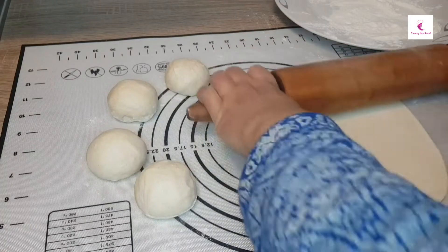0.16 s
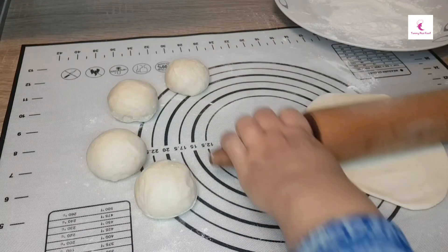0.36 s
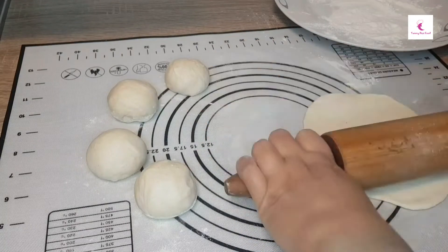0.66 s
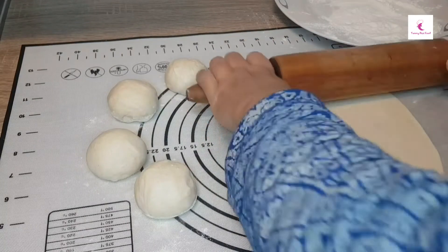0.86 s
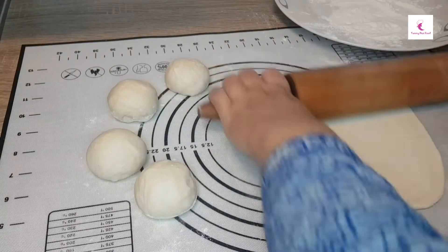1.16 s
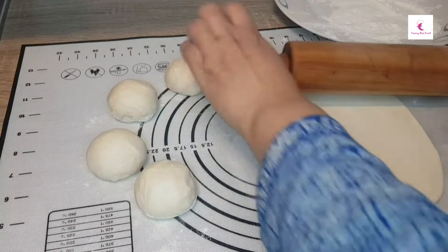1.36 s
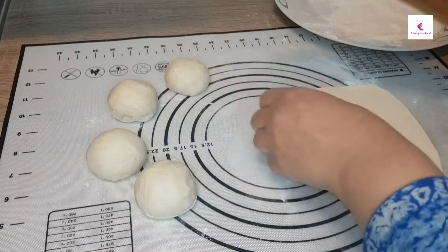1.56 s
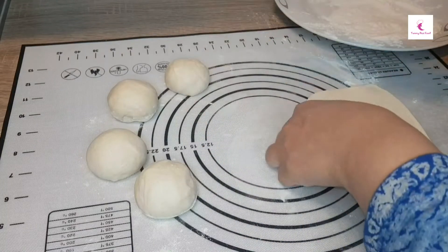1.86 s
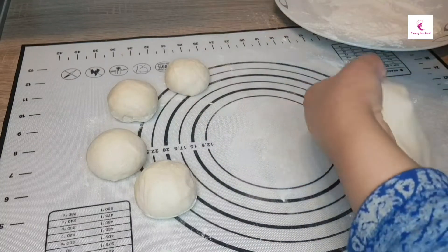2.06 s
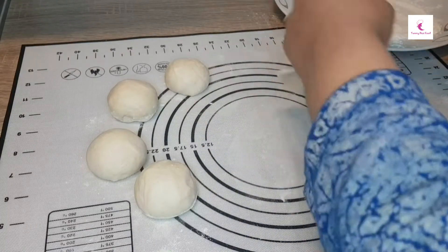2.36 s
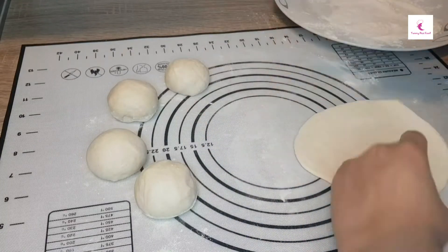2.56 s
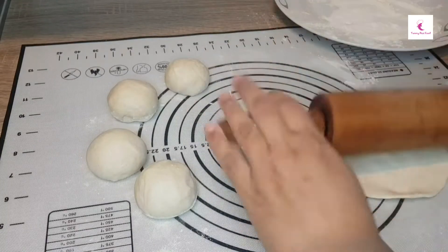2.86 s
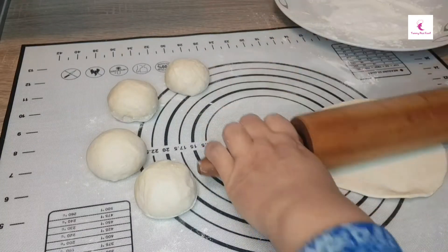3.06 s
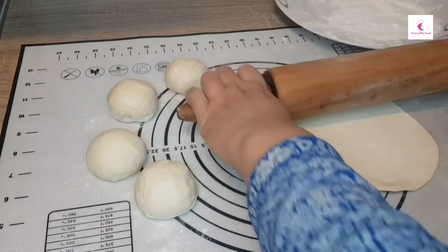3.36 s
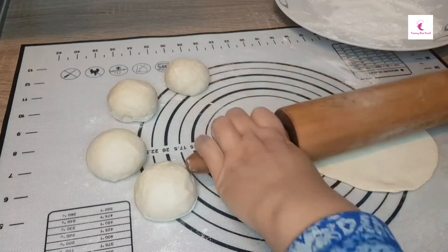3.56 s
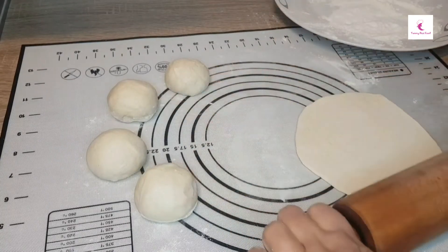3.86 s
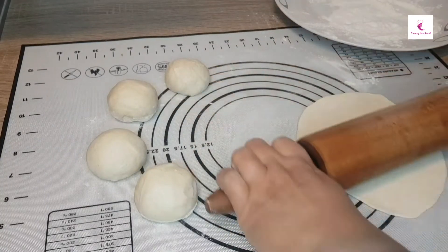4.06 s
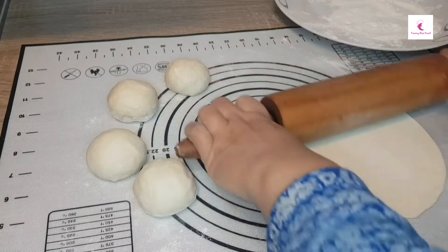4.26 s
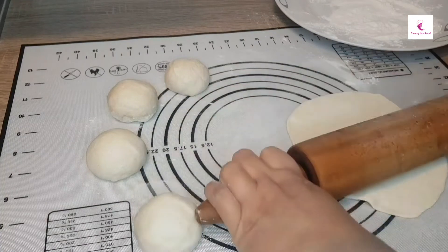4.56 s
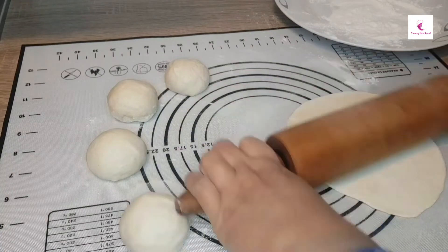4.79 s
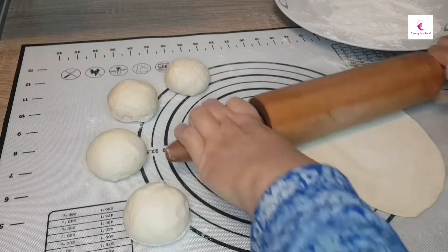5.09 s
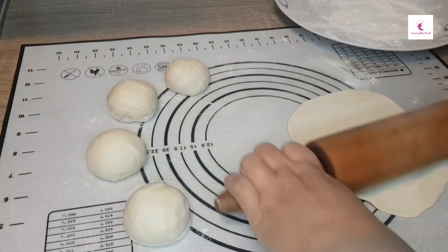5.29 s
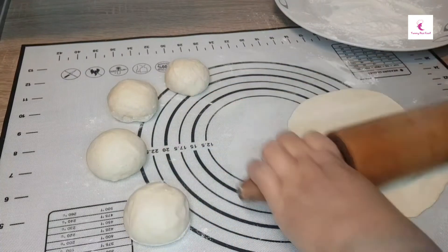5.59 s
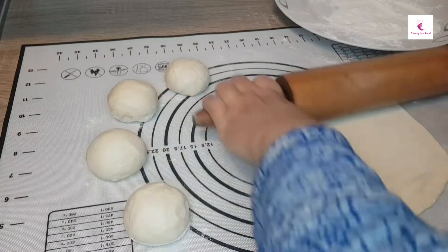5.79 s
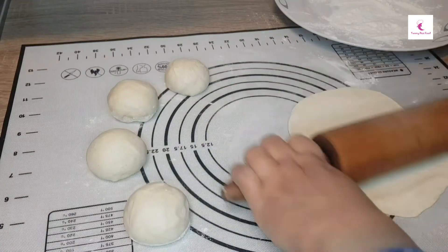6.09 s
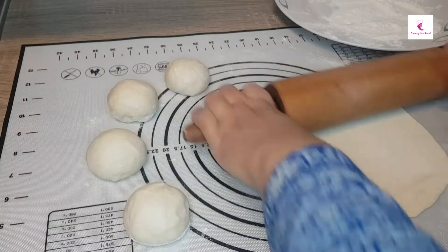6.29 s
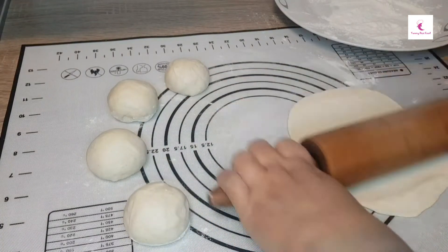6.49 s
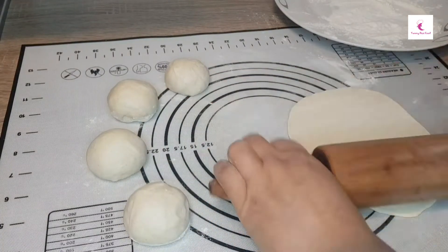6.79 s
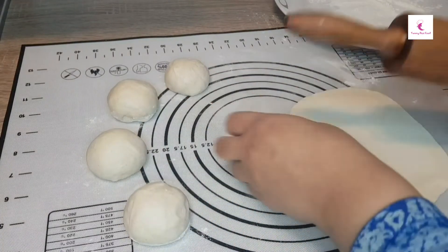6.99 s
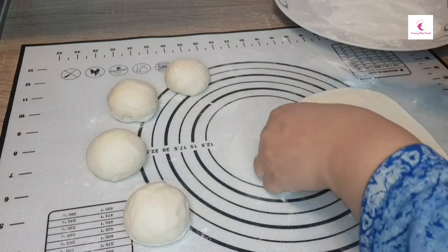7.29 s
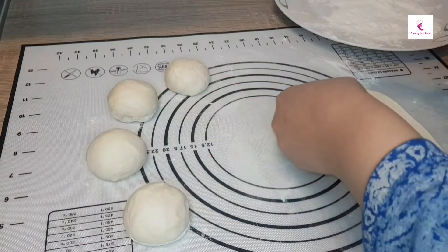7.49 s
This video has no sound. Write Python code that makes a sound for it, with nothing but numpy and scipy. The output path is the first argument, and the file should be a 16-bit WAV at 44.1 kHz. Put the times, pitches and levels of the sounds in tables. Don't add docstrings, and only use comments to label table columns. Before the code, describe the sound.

Wooden rolling pin swishes and rumbles over floured dough on a mat, pauses for sharp wooden cracks and sticky snaps, then rolls again.

```python
import sys
import numpy as np
from scipy import signal
from scipy.fft import rfft, irfft, next_fast_len
from scipy.io import wavfile

SR = 44100
rng = np.random.default_rng(int(sys.argv[2]) if len(sys.argv) > 2 else 0)


def gain_from_db(level_db):
    decades = np.asarray(level_db, float) / 20
    return 10 ** decades


def unload_wav(signal):
    wavfile.write(
        sys.argv[1],
        SR,
        np.round(np.clip(np.atleast_2d(signal).T, -1, 1) * 32767).astype(np.int16),
    )


N = 336914

# hz, level_db (per Hz)
HISS_COLOUR = [(3600, -41), (4700, -3.5), (6500, -2), (8500, -5.5), (10500, -6.5), (13000, -2),
               (15950, -9.5), (16200, -51.5)]
# hz, level_db (per Hz)
RUB_LOW_COLOUR = [(650, -23), (950, -10.5), (1250, -3.5), (1720, 4.5), (2150, -4), (2600, -27.5)]
# hz, level_db (per Hz)
RUB_HIGH_COLOUR = [(1900, -21.5), (2500, -4.5), (3100, -1), (3700, -4.5), (4500, -5.5), (5500, -33)]
# hz, level_db (per Hz)
SQUEEZE_COLOUR = [(140, -33), (230, -6.5), (317, -1), (351, -10), (604, -8), (833, -15), (1500, -18),
                  (1950, -47.5), (3300, -120)]
# hz, level_db (per Hz)
RUMBLE_COLOUR = [(12, -41), (20, 3.5), (43, 1.5), (102, 1), (160, -7), (199, -1.5), (260, -11), (340, -38),
                 (570, -120)]
# hz, likeness (0-1)
MAT_LIKENESS = [(60, 0.93), (180, 0.78), (550, 0.97), (1650, 0.13), (5000, 0.044), (15000, 0.048)]
# low_rub_db, high_rub_db
PASS_GRIP = [(0, 2), (-5.5, 0.5), (2.5, 0.5), (-1, 1), (2, 3), (-1, 1.5), (4, -0.5), (1, -2), (1, -0.5),
             (-1, -2.5), (3, -4), (3, -3), (-1, -1), (4, 0), (-2, -3.5), (1.5, 0), (6.5, 0), (4.5, -0.5),
             (5, 4), (-2, 2.5), (-8, -2.5), (-1.5, 7), (-6, 1)]
PIN_LANDINGS = [
    0.163,
    0.528,
    0.897,
    1.138,
]


def strokes():
    s, half_s, speed_db, bright_db, rub_db, squeeze_db, weight_db = moves()
    flour = gritty(3500, 2.1, 0.8)

    hiss = two_ports(flour, HISS_COLOUR, MAT_LIKENESS, pan_db=-1.5, lag_ms=0.19)
    hiss_sink_db = (9, 15)
    bright = signal.sosfilt(signal.butter(1, 9900, "high", fs=SR, output="sos"), hiss)
    dark = (hiss - bright) * swells(s, half_s, speed_db, hiss_sink_db)
    bright = bright * swells(s, half_s, speed_db + bright_db, hiss_sink_db)
    hiss = (dark + bright) * gain_from_db(1.0 * drift(30))

    rub_low = two_ports(flour, RUB_LOW_COLOUR, MAT_LIKENESS, pan_db=-3.0, lag_ms=0.082)
    rub_high = two_ports(flour, RUB_HIGH_COLOUR, MAT_LIKENESS, pan_db=-2.0, lag_ms=0.12)
    rub_sink_db, rub_high_db = (15, 12), 1.5
    hand_moves = len(s) - len(PASS_GRIP)
    low_db, high_db = np.pad(np.transpose(PASS_GRIP), [(0, 0), (0, hand_moves)])
    rub = rub_low * swells(s, half_s, rub_db + low_db, rub_sink_db)
    rub = rub + rub_high * swells(s, half_s, rub_db + high_db + rub_high_db, rub_sink_db)
    friction = hiss + rub * gain_from_db(2.0 * drift(30))

    pressed_s = s + .005
    squeeze = two_ports(gritty(900, 1.3, .9), SQUEEZE_COLOUR, MAT_LIKENESS, pan_db=-2.5, lag_ms=0.23)
    squeeze = squeeze * swells(pressed_s, half_s, squeeze_db, (10.5, 7)) * gain_from_db(3.2 * drift(28))
    rumble = two_ports(gritty(150, 2.1, 0.49), RUMBLE_COLOUR, MAT_LIKENESS, pan_db=-1.4, lag_ms=.1)
    rumble = rumble * swells(pressed_s, half_s, weight_db, (11, 10)) * gain_from_db(0.99 * drift(22))

    lift_s, lift_db = .035, -7
    before_s = np.array(PIN_LANDINGS)[:, None] - np.arange(N) / SR
    lift = np.sum(np.clip(2 - before_s / lift_s, 0, 1) * (before_s > 0), axis=0)
    pressure = (squeeze + rumble) * gain_from_db(lift_db * lift)
    return friction + 0.59 * pressure + gain_from_db(-50.0) * counter(pressure, damping=0.5)


# start_s (at full speed), flour_hiss_db, squeeze_db, weight_db
PIN_PASSES = [(0.065, -64, -56, -46.5), (0.238, -67, -58, -47.5), (0.41, -62.5, -59, -47.5),
              (0.586, -64, -56.5, -46), (0.789, -59.5, -56, -52), (.96, -63.5, -60.5, -46.5),
              (1.156, -61.5, -55.5, -46), (1.276, -67.5, -62, -61), (4.495, -67.5, -68, -64.5),
              (4.642, -66, -64.5, -57), (4.808, -65, -59, -62), (5.001, -63, -59, -55),
              (5.194, -63, -61, -56.5), (5.388, -63, -57, -55), (5.577, -61.5, -54.5, -49.5),
              (5.784, -61.5, -55.5, -52), (5.96, -61.5, -54, -46.5), (6.131, -63, -56.5, -54.5),
              (6.226, -63, -66, -55), (6.382, -61.5, -54, -45.5), (6.558, -59.5, -54, -52),
              (6.68, -68, -74, -61), (6.774, -57.5, -55.5, -52.5)]
# half_length_s, extra_brightness_db
PASS_PACE = [(0.084, 4), (0.078, 1), (0.069, 0.1), (0.079, -1.5), (0.074, -3.5), (0.075, -1.5), (0.077, -1),
             (0.063, 4.5), (0.076, 10.5), (0.097, 0.1), (0.11, -3.5), (0.086, -7.5), (0.083, -1),
             (0.09, -11), (0.081, 1.3), (0.078, -12), (0.067, -5), (0.08, -9), (0.066, -1), (0.087, 0.5),
             (0.074, -5), (.08, -3), (0.076, 1.5)]
# start_s, half_length_s,
# flour_hiss_db, squeeze_db, weight_db
HAND_MOVES = [(1.46, 0.076, -67.5, -69.5, -70), (1.56, 0.065, -103, -65, -87),
              (1.71, 0.069, -100, -71.5, -51), (1.8, .04, -70.5, -97, -64), (2.005, 0.04, -65.5, -102, -90),
              (2.08, 0.06, -70, -79, -88), (2.36, 0.2, -78, -76.5, -88), (2.55, 0.092, -65.5, -61, -70),
              (3.05, 0.17, -67.5, -58.5, -56.5), (2.89, 0.05, -81.5, -94, -79.5),
              (3.192, 0.022, -57.5, -52.5, -43.5), (3.23, 0.033, -64.5, -50.5, -53),
              (3.285, 0.041, -63, -55.5, -53), (3.37, 0.092, -72, -75, -77.5),
              (3.77, 0.15, -66, -68.5, -64), (3.98, 0.05, -94, -78, -54), (4.26, .1, -70.5, -72, -71),
              (4.36, 0.079, -91.5, -78, -67), (6.86, 0.071, -59, -72, -81),
              (7.03, 0.069, -71.5, -89.5, -89), (7.28, 0.1, -68, -94, -68.5),
              (7.46, 0.11, -67.5, -74.5, -85.5), (7.595, .02, -71, -73, -60)]


def moves():
    s, speed_db, squeeze_db, weight_db = np.transpose(PIN_PASSES)
    half_s, bright_db = np.transpose(PASS_PACE)
    pin = [s, half_s, speed_db, squeeze_db, weight_db, np.full(len(s), -6)]
    hand = [*np.transpose(HAND_MOVES), np.full(len(HAND_MOVES), -9.5)]
    s, half_s, speed_db, squeeze_db, weight_db, tool_db = np.hstack([pin, hand])
    bright_db = np.pad(bright_db, (0, len(HAND_MOVES)))
    speed_share = 0.61
    rub_db = tool_db + speed_share * speed_db + (1 - speed_share) * squeeze_db
    return s, half_s, speed_db, bright_db, rub_db, squeeze_db, weight_db


def swells(s, half_s, db, sink_db):
    t = np.arange(0, N + 64, 64) / SR
    away = (t - s[:, None]) / half_s[:, None]
    sink = np.where(away < 0, sink_db[0], sink_db[1])
    level_db = db[:, None] - sink * np.abs(away) ** 1.53
    return np.interp(np.arange(N) / SR, t, np.sqrt(np.sum(gain_from_db(level_db) ** 2, axis=0)))


# start_s, peak_db, left_right_db, room_db, scatter_ms
CRACKS = [
    (2.482, -29.5, -4.5, -2.5, 3.1),
    (2.935, -12.5, -19, 5, 1.25),
    (3.483, -5.5, -4.5, -5, 3.14),
    (3.553, -8.5, -4, -5.5, 1.27),
    (3.8255, -30.5, -1, -6.5, 1.5),
    (4.077, -4.5, -9.5, -2, 1.39),
    (6.801, -17, -5, -9, 2.14),
]
CRACK_LAG_MS = [0.12, 0.3, 0.15, .14, 0.24, 0.16, 0.15]
# hz, level_db (per Hz)
EARLY_CRACK_COLOURS = [
    [(320, -27.5), (550, -11), (1080, -6.5), (1220, 1), (1520, -7.5), (1680, 4.5), (2690, -10),
     (3570, -5.5), (4500, -14.5), (12000, -28.5), (15600, -58), (22000, -120)],
    [(320, -49), (550, -16.5), (651, -14.5), (953, -24.5), (1720, -15), (2520, -6.5), (2950, -4.5),
     (3960, -8), (5480, -10.5), (6130, -19), (7580, -18.5), (8850, -32.5), (16000, -35.5)],
    [(240, -50.5), (400, -23.5), (645, -23.5), (1230, -22), (2430, -0.5), (2710, -9.5), (3070, 4),
     (4110, -16.5), (4510, -17.5), (5030, -27.5), (5520, -12.5), (6440, -26), (16000, -44.5)],
]
# hz, level_db (per Hz)
LATE_CRACK_COLOURS = [
    [(240, -36.5), (400, -16), (460, -19.5), (626, 0), (687, -10), (1060, -30), (1460, -9.5), (1680, -14.5),
     (2020, -7), (3310, -5.5), (4900, -15.5), (5600, -9.5), (6640, -26), (16000, -48)],
    [(150, -42.5), (250, -28), (308, -14.5), (387, -15.5), (480, -4.5), (1030, -24), (1200, -52),
     (3000, -41), (3900, -90), (6600, -120)],
    [(240, -56.5), (400, -25), (480, -31.5), (600, -18.5), (719, -28.5), (1060, -28.5), (1580, -13.5),
     (2630, -8.5), (2970, -5), (4180, -14.5), (4900, -20.5), (5520, -14), (6850, -23.5), (7870, -20.5),
     (9500, -33), (16000, -43)],
    [(240, -26), (400, -25.5), (561, -11), (945, -18), (1380, -11.5), (1740, 1), (2120, -10), (3340, -1),
     (4120, -18.5), (9000, -47.5), (11700, -30.5), (19800, -120)],
]
# crack_index, delay_s, level_db
CRACK_BOUNCES = [(0, .004, 12), (1, .0025, -23.5), (2, 0.0032, -6.5), (2, .016, -11.5), (2, 0.0068, -27),
                 (4, .022, -6.5), (4, 0.032, -5), (4, 0.041, -7), (5, .0025, 1), (5, .0085, 3),
                 (5, .025, -7.5), (6, 0.003, 9), (6, .005, -10), (3, .0025, -13.5), (3, .006, -12.5)]
# crack_index, pitch_hz, level_db, t60_s
PIN_RINGS = [(0, 1247, -63.5, 0.079), (0, 1665, -47, .15), (1, 1763, -50, 0.23), (1, 2220, -56.5, 0.12),
             (1, 2760, -53, .12), (1, 2900, -53, .25), (1, 3018, -48, .1), (1, 3250, -50, .12),
             (1, 4323, -56, .12), (1, 5400, -57, .2), (1, 7340, -51, .08), (2, 1610, -48, .12),
             (2, 7540, -40.5, .04), (2, 2143, -49.5, .15), (2, 2420, -49, 0.15), (2, 6000, -52.5, .1),
             (2, 3035, -48.5, 0.14), (2, 3300, -46.5, .12), (2, 4474, -39.5, .13), (2, 5530, -47, .07),
             (3, 639, -56.5, .1), (3, 1514, -47.5, .15), (3, 1885, -45.5, .12), (3, 5490, -47.5, 0.072),
             (3, 2400, -57, 0.15), (3, 3186, -43, 0.092), (3, 4265, -49, 0.11), (4, 305.4, -54.5, .13),
             (4, 440, -47.5, 0.046), (4, 510, -46.5, 0.098), (4, 648.4, -48, 0.086), (5, 1592, -54, 0.25),
             (5, 2470, -53.5, .2), (5, 2960, -53.5, .18), (5, 3332, -55, .16), (5, 4570, -41.5, 0.14),
             (5, 5435, -39.5, .2), (5, 6083, -43, .1), (5, 7840, -46.5, .04), (6, 595, -57, 0.08),
             (6, 1765, -58.5, 0.11), (6, 1930, -50.5, 0.11), (6, 4480, -35, .03), (6, 2846, -47, 0.14),
             (6, 3370, -47, 0.12)]


def blows(room):
    out, n = np.zeros((2, N)), np.arange(2600)
    colours = EARLY_CRACK_COLOURS + LATE_CRACK_COLOURS
    soften = signal.butter(2, 4000, fs=SR, output="sos")
    for k, (s, db, pan_db, room_db, scatter_ms) in enumerate(CRACKS):
        fade = np.exp(-n / (scatter_ms * SR / 1000))
        first = rng.standard_normal(len(n)) * fade * np.minimum(n / 30, 1)
        first = irfft(np.exp(1j * np.angle(rfft(first)))) * fade ** .3
        dull = signal.sosfilt(soften, first)
        contact = first.copy()
        for index, delay_s, bounce_db in CRACK_BOUNCES:
            if index == k:
                bounce = dull if delay_s > .012 else first
                contact += gain_from_db(bounce_db) * np.roll(bounce, round(delay_s * SR))
        struck = np.pad(signal.fftconvolve(contact, causal_pulse(colours[k])), (0, SR // 8))
        hit = struck.copy()
        for index, hz, pin_db, t60 in PIN_RINGS:
            if index == k:
                hit += gain_from_db(pin_db) * ring(struck, hz, t60)
        hit = gain_from_db(db - 0.5) * hit / np.abs(hit).max()
        add(out, heard(hit, room, pan_db, CRACK_LAG_MS[k], room_db, (-80, -80, -80)), s - .001)
    return out


# start_s, peak_db, low_modes_db, middle_modes_db, high_modes_db
COUNTER_PUSHES = [(2.48, -36.5, -29, -30.5, -27), (2.931, -30.5, -20.5, -20, -44),
                  (2.953, -31, -14, -48, -28), (3.0, -39, -12, -19, -50), (3.478, -22.5, -29.5, -32, -32.5),
                  (3.546, -37, -30, -26, -14), (3.825, -30, -28, -27.5, -23),
                  (4.074, -20.5, -30.5, -21.5, -28.5), (4.086, -25, -29.5, -33, -29),
                  (4.15, -34.5, -21, -37, -39), (6.793, -71, -39, -43.5, -12),
                  (3.173, -35.5, -25, -58, -38), (5.191, -54.5, -50, -12, -37),
                  (6.229, -52.5, -13, -41, -32), (4.73, -70.5, -54, -38.5, -32),
                  (0.162, -45.5, -26, -32, -23), (0.528, -49.5, -29, -20, -21),
                  (0.897, -48.5, -20.5, -22.5, -22), (1.137, -53.5, -19, -17, -15)]


def thumps(room):
    out = np.zeros((2, N))
    no_bass = signal.butter(2, 60.0, "high", fs=SR, output="sos")
    push = signal.sosfilt(no_bass, np.pad(np.hanning(230) ** 2, (0, 3000)))
    for s, db, *place_db in COUNTER_PUSHES:
        add(out, heard(gain_from_db(db - 11.0) * push, room, -.3, .1, -1.5, place_db), s)
    return out


# start_s, peak_db, pitch_hz, sharpness_q, counter_ring_db
DULL_TAPS = [(0.164, -45.5, 430, 2, -45), (0.529, -47.5, 630, 2.1, -34), (0.898, -48, 423, 1, -36),
             (0.957, -67, 382, 0.6, -27), (1.138, -42, 384, 0.19, -29), (1.267, -42, 570, 1.34, -56),
             (1.495, -43.5, 1274, 1.8, -65), (1.562, -57, 503, 3.1, -50), (1.678, -59.5, 423, 1.15, -24),
             (1.993, -56, 1130, 1.6, -47), (2.05, -50, 1030, 0.58, -47), (3.1745, -36.5, 1100, 0.43, -37),
             (3.198, -59, 560, 1.1, -28), (5.572, -50, 546, 0.56, -12), (6.1105, -38.5, 804, 1.7, -42),
             (6.2245, -39, 648, 0.88, -28), (6.328, -55, 382, 0.74, -22), (6.519, -42, 690, 2.1, -59),
             (6.727, -52, 510, 2.5, -43), (7.589, -64, 584, 0.6, -48)]
# start_s, peak_db, pitch_hz, sharpness_q, counter_ring_db
DOUGH_SNAPS = [(2.0685, -30, 12700, 0.6, -54), (2.0742, -38.5, 10600, 1.1, -60),
               (2.4838, -35.5, 5630, 0.9, -61.5), (2.5125, -44.5, 5740, 1.5, -56),
               (3.1985, -38.5, 2230, 1.4, -63), (3.21, -46, 1780, 3.3, -60), (3.263, -44.5, 1790, 1.5, -58),
               (3.1765, -52.5, 5000, 0.66, -60), (3.2635, -32.5, 3970, 1.3, -62),
               (3.2638, -26, 8800, 1.9, -62), (3.268, -36.5, 6750, 2.25, -55),
               (6.4075, -32.5, 4910, 0.56, -60), (6.4108, -23.5, 9100, 1.4, -58)]


def taps_and_snaps(room):
    taps = small_contacts(DULL_TAPS, room, room_db=-2, order=1)
    return taps + small_contacts(DOUGH_SNAPS, room, room_db=-6, order=2)


def small_contacts(table, room, room_db, order):
    out = np.zeros((2, N))
    for s, db, hz, q, counter_db in table:
        pulse = (np.arange(1500) == 1).astype(float)
        for _ in range(order):
            pulse = ring(np.diff(pulse, prepend=0.), hz, 3.64 * q / hz)
        pulse = gain_from_db(db - 0.5) * pulse / np.abs(pulse).max()
        add(out, heard(pulse, room, -4.0, 0.169, room_db, [counter_db] * 3), s)
    return out


# start_s, pitch_hz, level_db
AXLE_DRAG = [(4.58, 1625, -63), (4.7, 1657, -69.5), (4.998, 1593, -73.5), (5.199, 1417, -69.5),
             (5.4, 1650, -70), (5.67, 1614, -75), (5.78, 1640, -66), (5.86, 1632, -69.5), (5.95, 1632, -69),
             (6.171, 1590, -66), (6.4, 1407, -86)]


def axle():
    s, hz, db = np.transpose(AXLE_DRAG)
    t = np.arange(N) / SR
    r = np.exp(-np.pi * 175 / SR)
    slow = [rms_one(signal.lfilter([1], [1, -2 * r, r * r], g)) for g in gritty(1200, 1.3, 1.0)]
    turn = 2 * np.pi * np.cumsum(np.interp(t, s, hz)) / SR
    tone = slow[0] * np.cos(turn) + slow[1] * np.sin(turn)
    loose_until_s = 5.1
    loose = gain_from_db(-1.5) * np.clip((loose_until_s - t) / 0.056, 0, 1)
    tone = tone + loose * rms_one(ring(rng.standard_normal(N), 1360, 0.013))
    tone = tone + gain_from_db(-7.5) * rms_one(ring(rng.standard_normal(N), 694, 0.023))
    tone = tone * gain_from_db(1.5 * drift(6.4))
    edge = np.clip(np.minimum(t - s[0], s[-1] - t) / 0.12, 0, 1)
    tone = tone * edge * gain_from_db(np.interp(t, s, db) + 5.5)
    return np.array([np.roll(tone, 14) * gain_from_db(-8.0), tone * gain_from_db(3.55)])


# start_s, level_db
PEEL_LEVEL = [
    (2.05, -110),
    (2.14, -83),
    (2.3, -75.5),
    (2.44, -75),
    (2.5, -110),
]
# hz, level_db (per Hz)
PEEL_SWISH = [(3300, -28), (4100, -5), (4600, 0), (5100, -6.5), (6200, -28.5)]


def peel():
    s, db = np.transpose(PEEL_LEVEL)
    swish = two_ports(rng.standard_normal((2, N)), PEEL_SWISH, MAT_LIKENESS, pan_db=-13.0, lag_ms=0.11)
    return gain_from_db(np.interp(np.arange(N) / SR, s, db)) * swish


# pitch_hz, level_db, t60_s
COUNTER_MODES = [(47.7, -14, 0.2), (108, -0.5, 0.12), (110.55, -5, 0.52), (142.4, -17, 0.38),
                 (194.4, -15, 0.2), (197.6, -6.5, 0.36), (237, -18, 0.22), (315.8, -4.5, 0.34),
                 (550, -18.5, 0.22)]


def counter(x, damping=1, place_db=(0, 0, 0)):
    weight_db = list(zip((108, 199, 318), place_db))
    out = 0
    for k, (hz, db, t60) in enumerate(COUNTER_MODES):
        out = out + (-1) ** k * gain_from_db(db + at_hz(weight_db, hz)) * ring(x, hz, t60 * damping)
    return out


# hz, t60_s
ROOM_DECAY = [(100, 0.85), (500, 0.39), (1500, 0.35), (3000, 0.3), (5500, 0.165), (9000, 0.17),
              (15000, 0.052)]
# hz, level_db
ECHO_COLOUR = [(300, 8), (3500, -1.5), (6000, -11.5), (10000, -3), (16000, 0)]
# hz, left_right_db
ECHO_BALANCE = [(250, -3.5), (500, -4.5), (1000, 0), (2000, 1.5), (4000, -0.5), (8000, 2)]
# pitch_hz, width_hz, level_db, t60_s
CROCKERY_RINGS = [(2930, 350, 4, .31), (4450, 200, 3, .2), (5450, 250, 5, .175)]


def room_answer():
    t, out = np.arange(SR // 2) / SR, 0
    sides = np.array([[1], [-1]])
    edges = 40 * 2 ** np.arange(0, 9.1, .5)
    for low, high in zip(edges, edges[1:]):
        band = signal.butter(2, [low, high], "band", fs=SR, output="sos")
        hz = np.sqrt(low * high)
        t60, alike = at_hz(ROOM_DECAY, hz), np.clip(1.05 - hz / 1100, .1, .98)
        shared, own = signal.sosfilt(band, rng.standard_normal((2, len(t))))
        pair = np.sqrt(1 + alike) * shared + np.sqrt(1 - alike) * own * sides
        pair = pair * gain_from_db(at_hz(ECHO_BALANCE, hz) / 2 * sides)
        out = out + pair * gain_from_db(at_hz(ECHO_COLOUR, hz) - 60 * t / t60) / np.sqrt(t60)
    for hz, width_hz, db, t60 in CROCKERY_RINGS:
        band = signal.butter(2, [hz - width_hz / 2, hz + width_hz / 2], "band", fs=SR, output="sos")
        slower = gain_from_db(db + 60 * t * (1 / at_hz(ROOM_DECAY, hz) - 1 / t60)) - 1
        out = out + signal.sosfilt(band, out) * slower
    out = out * np.clip(t / 0.0026, 0, 1)
    return out / np.sqrt(np.sum(out ** 2) / 2)


def heard(sound, room, pan_db, lag_ms, room_db, place_db):
    sound = np.pad(sound, (0, room.shape[1]))
    n = np.arange(len(sound))
    left = np.interp(n - lag_ms * SR / 1000, n, sound, left=0)
    direct = np.array([left * gain_from_db(pan_db / 2), sound / gain_from_db(pan_db / 2)])
    wet = signal.fftconvolve(room, sound[None], axes=1)[:, :len(sound)]
    return direct + gain_from_db(room_db) * wet + counter(sound, place_db=place_db) * gain_from_db([[.45], [-.45]])


# hz, level_db (per Hz)
AIR_COLOUR = [(12, -32.5), (20, -16.5), (96, 3.5), (265, -10), (323, -9.5), (428, -22), (521, -1.5),
              (599, -10), (3620, -18.5), (4600, -21), (6350, -18.5), (8890, -26), (10500, -12),
              (12800, -10), (15950, -10), (16200, -50)]
# hz, likeness (0-1)
AIR_ALIKE = [(60, 0.82), (240, 0.29), (950, 0.09), (3770, 0.066), (15000, 0.035)]


def air():
    hush = two_ports(rng.standard_normal((2, N)), AIR_COLOUR, AIR_ALIKE, pan_db=0.0, lag_ms=0)
    hum = rms_one(ring(rng.standard_normal(N), 335, 0.04))
    return gain_from_db(-71) * (hush + 0.33 * hum)


def rms_one(x):
    return x / np.sqrt(np.mean(x ** 2) + 1e-20)


def at_hz(points, hz):
    points = np.array(points)
    return np.interp(np.log(np.maximum(hz, 1)), np.log(points[:, 0]), points[:, 1])


def drift(rate_hz):
    r = np.exp(-2 * np.pi * rate_hz / SR)
    return rms_one(signal.lfilter([1], [1, -2 * r, r * r], rng.standard_normal(N + SR))[SR:])


def gritty(per_s, spread_db, smooth):
    size_db = spread_db * np.minimum(rng.exponential(1, (2, N)), 4)
    grains = (rng.random((2, N)) < per_s / SR) * gain_from_db(size_db)
    return rms_one(grains * rng.choice([-1, 1], (2, N))) + smooth * rng.standard_normal((2, N))


def ring(x, hz, t60):
    r, w = gain_from_db(-60 / (t60 * SR)), 2 * np.pi * hz / SR
    return signal.lfilter([0, np.sin(w)], [1, -2 * r * np.cos(w), r * r], x + 1e-18)


def causal_pulse(spectrum, size=4096):
    cepstrum = irfft(np.log(gain_from_db(at_hz(spectrum, np.arange(size // 2 + 1) * SR / size))))
    cepstrum[1:size // 2] *= 2
    cepstrum[size // 2 + 1:] = 0
    pulse = irfft(np.exp(rfft(cepstrum)))
    return pulse / np.abs(pulse).max()


def two_ports(pair, spectrum, likeness, pan_db, lag_ms):
    size = next_fast_len(N)
    hz = np.arange(size // 2 + 1) * SR / size
    alike = np.clip(at_hz(likeness, hz), 0, 1)
    shared, own = rfft(pair, size) * gain_from_db(at_hz(spectrum, hz))
    shared, own = np.sqrt(1 + alike) * shared, np.sqrt(1 - alike) * own
    left = (shared + own) * np.exp(-2j * np.pi * hz * lag_ms / 1000)
    right = shared - own
    return rms_one(irfft([left * gain_from_db(pan_db / 2), right / gain_from_db(pan_db / 2)], size)[:, :N])


def add(track, sound, s):
    i = round(s * SR)
    track[:, i:i + sound.shape[1]] += sound[:, :N - i]


def scene():
    room = room_answer()
    knocks = blows(room) + thumps(room) + taps_and_snaps(room)
    return strokes() + knocks + axle() + peel() + air()


def low_pass(x):
    return signal.sosfilt(signal.butter(12, 16660, fs=SR, output="sos"), x)


def record(dry):
    top = signal.cheby2(10, 60, 17000, fs=SR, output="sos")
    mix = signal.sosfilt(top, 0.71 * np.tanh(dry / 0.7))
    return low_pass(mix)


dry = scene()
out = record(dry)
unload_wav(out)
```